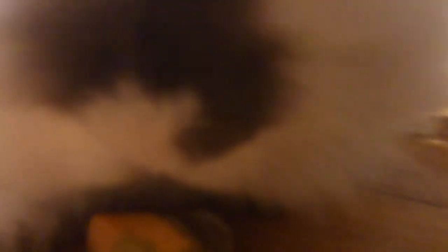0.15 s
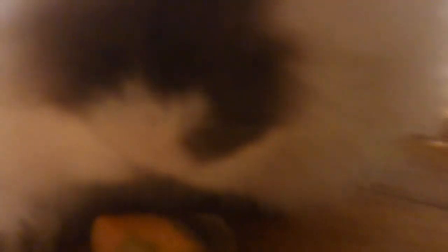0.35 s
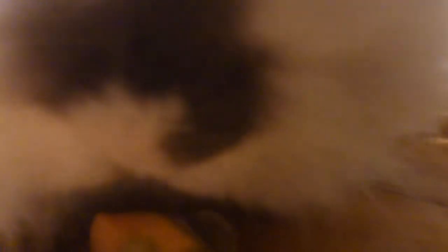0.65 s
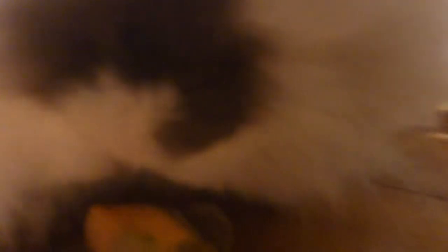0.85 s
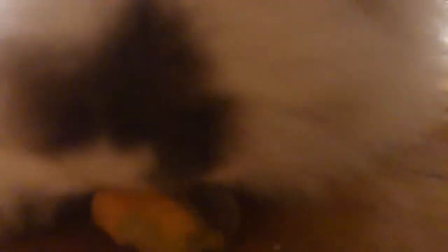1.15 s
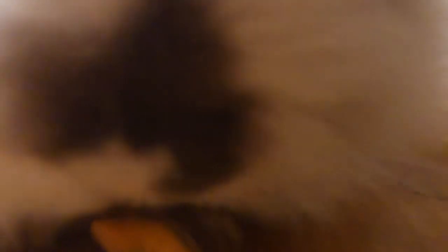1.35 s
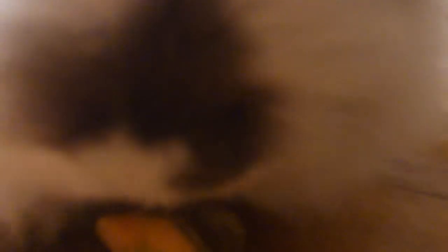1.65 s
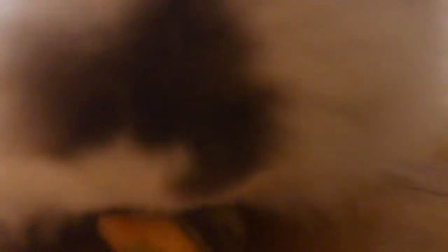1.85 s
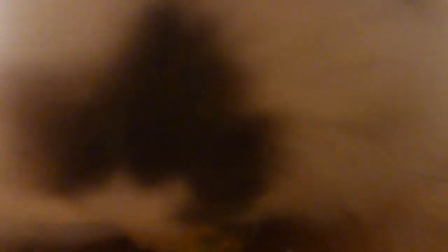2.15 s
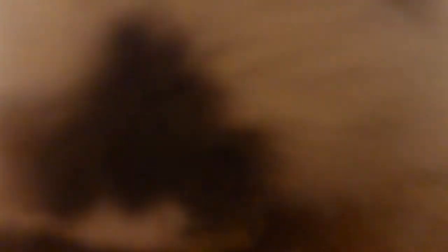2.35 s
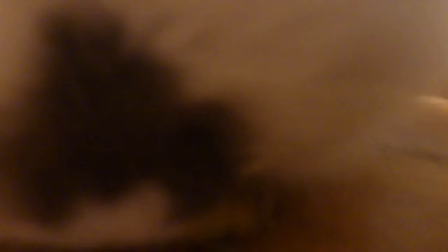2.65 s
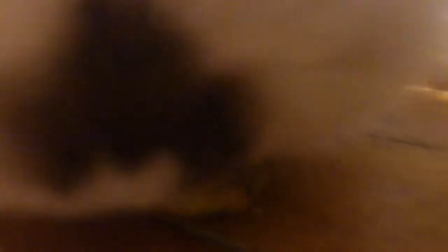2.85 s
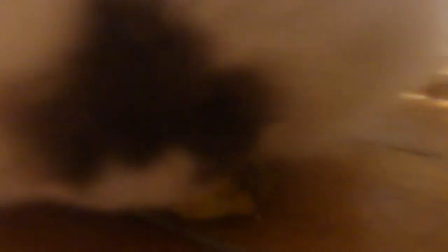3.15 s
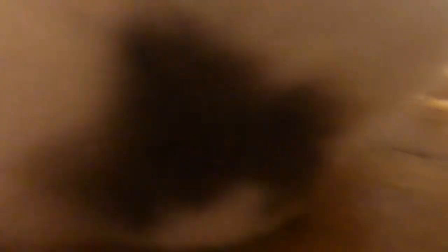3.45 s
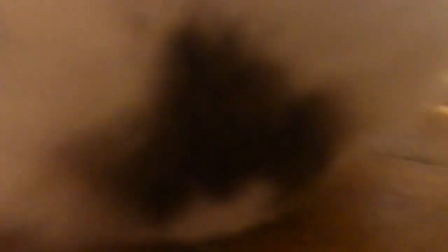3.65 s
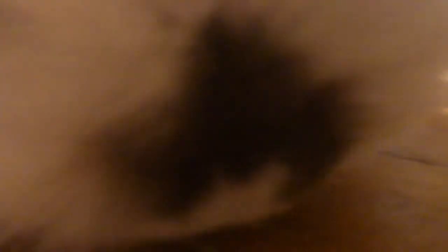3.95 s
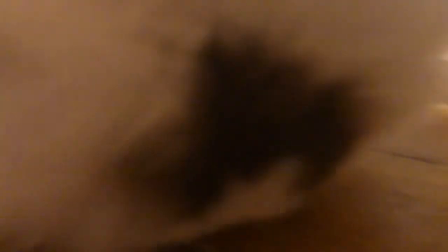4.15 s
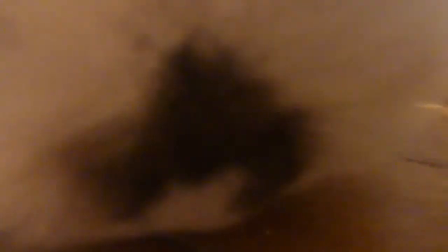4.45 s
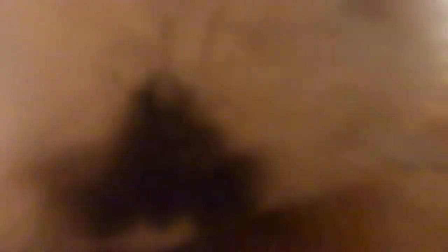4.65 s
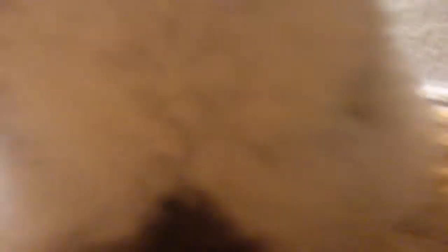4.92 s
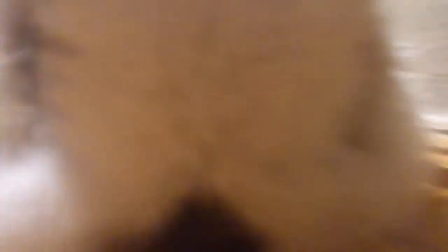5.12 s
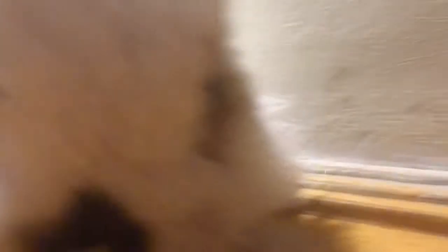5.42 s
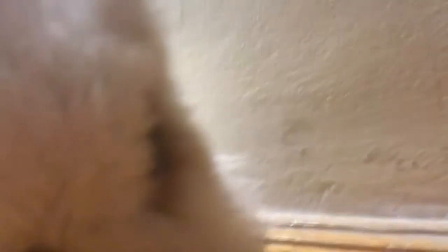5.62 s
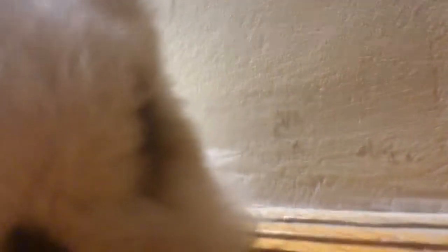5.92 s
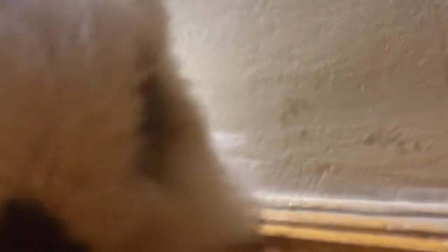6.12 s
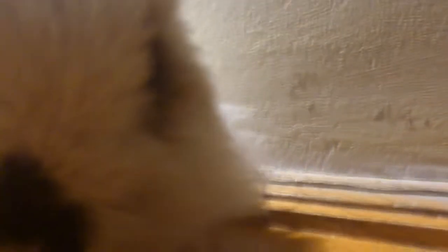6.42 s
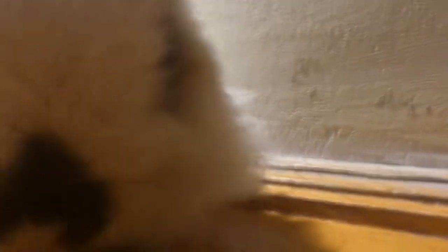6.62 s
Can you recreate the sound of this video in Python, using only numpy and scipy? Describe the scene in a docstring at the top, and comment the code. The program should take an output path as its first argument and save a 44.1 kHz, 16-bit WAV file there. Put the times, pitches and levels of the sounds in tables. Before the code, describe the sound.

Very close, dull rapid rabbit chewing gives way to a sharp carrot bite and crisp wet crunching, while a low drone swells behind.

```python
"""A quiet humming room: a rabbit eats a carrot very close by, a little to the left.
It grinds with its mouth shut, four or five strokes a second, then bites off a fresh piece and crunches brightly.
Each stroke is a swarm of tiny bursts, the crushed cells; snapping fibre bundles are single filtered clicks.
Wet pops are decaying sines, sniffs and air are shaped noise, and hum and drone are wavering sines.
The low drone swells in the second half."""
import sys
import numpy as np
from scipy import signal
from scipy.fft import rfft, irfft, next_fast_len
from scipy.io import wavfile
from scipy.ndimage import map_coordinates

SR = 44100
rng = np.random.default_rng(int(sys.argv[2]) if len(sys.argv) > 2 else 0)


def to_wav(s):
    """Save 16-bit WAV."""
    ch = np.atleast_2d(s).T  # columns
    pcm = np.round(np.clip(ch, -1, 1) * 32767)  # PCM
    wavfile.write(sys.argv[1], SR, pcm.astype(np.int16))


N = 298998


def amp(db):
    """Decibels to gain."""
    return 10 ** (np.asarray(db) / 20)


def unit(x):
    """Scale to rms 1."""
    return x / np.sqrt(np.mean(x ** 2) + 1e-20)


def along(points, hz):
    """Read a curve of (Hz, value) points on a log frequency axis."""
    point_hz, values = np.transpose(points)
    return np.interp(np.log(hz + 1), np.log(point_hz + 1), values)


def curves(rows):
    """One value per sample for each column after the time."""
    times, *columns = np.transpose(rows)
    return [np.interp(np.arange(N) / SR, times, column) for column in columns]


def wobble(rate):
    """A smooth random curve, rate knots a second."""
    knots = rng.standard_normal(int(N * rate / SR) + 4)
    return map_coordinates(knots, [np.arange(N) * rate / SR])


def filtered(x, response):
    """Shape the spectrum of x by a response of frequency."""
    size = next_fast_len(N + SR // 2)
    return irfft(rfft(x, size) * response(np.fft.rfftfreq(size, 1 / SR)), size)[..., :N]


def swells(times, widths, levels_db):
    """Gain curve made of bell-shaped swells of power."""
    t = np.arange(0, N, 32) / SR
    bells = np.exp(-((t[:, None] - times) / widths) ** 2)
    power = bells @ amp(levels_db) ** 2
    return np.interp(np.arange(N) / SR, t, np.sqrt(power))


def add(out, s, sound):
    """Mix a stereo sound in at time s."""
    out[:, round(s * SR):][:, :sound.shape[1]] += sound


def ring(x, click):
    """Every burst in x rings with the given click."""
    return signal.fftconvolve(x, click, axes=1)[:, :N]


def ping(spectrum, lean_db, beam_hz, beam_octaves, pitch=1, spread=0.32, lead=.00014, size=1024):
    """Stereo click of mean energy 1: the left is lifted around beam_hz and leads; the right is lowered evenly."""
    hz = np.fft.rfftfreq(size, 1 / SR)
    beam = np.exp(-(np.log2((hz + 1) / pitch / beam_hz) / beam_octaves) ** 2)
    aim_db = lean_db * np.array([beam, np.full_like(hz, -spread)])
    cepstrum = irfft(np.log(amp(along(spectrum, hz / pitch) + aim_db)))
    cepstrum[:, 1:size // 2] *= 2  # causal: sharp front, ringing after
    cepstrum[:, size // 2 + 1:] = 0
    delay = 2j * np.pi * hz * np.array([[0], [lead]])
    click = irfft(np.exp(rfft(cepstrum) - delay))[:, :size // 2]
    return click / np.sqrt(np.sum(click ** 2) / 2)


def cells(rate, scatter_db, apart):
    """Stereo swarm of tiny bursts of uneven size, each with its own strength left and right."""
    bursts = (rng.random(N) < rate / SR) * rng.choice([-1, 1], N)
    sizes = amp(scatter_db * np.minimum(rng.standard_normal(N), 2))
    balance = 1 + apart * rng.standard_normal((2, N))
    return unit(bursts * sizes * balance)


def tone(hz, waver_hz, flutter_db):
    """A slightly unsteady sine of rms 1."""
    phase = 2 * np.pi * (np.cumsum(hz + waver_hz * wobble(5)) / SR + rng.random())
    return unit(np.sin(phase) * amp(flutter_db * wobble(7)))


# appliance hum, one row a partial: pitch_hz [Hz], level_db [dB rms]
HUM_PARTIALS = [(108.7, -50), (120.5, -53), (149.9, -57.5), (163.1, -56), (190.3, -53), (380.6, -66),
                (869.5, -62.5)]
# low drone from afar, a glide: time_s [s], pitch_hz [Hz], level_db [dB rms]
DRONE_GLIDE = [(0, 66.4, -72), (.9, 69.6, -50.5), (1.6, 76, -58), (3.2, 75.9, -61), (3.65, 65.94, -47),
               (4.3, 67.12, -44.5), (4.8, 67.8, -41), (5.2, 69.34, -40.5), (5.7, 69.7, -35.5),
               (6.1, 70, -38.5), (6.78, 68.3, -42)]
# colour of room air and microphone hiss: freq_hz [Hz], density_db [relative dB per Hz]
AIR_COLOUR = [(15, -1), (30, 1.5), (45, 6), (70, -3), (130, -9), (220, -10), (330, -10.5), (650, -15),
              (870, -16), (1100, -19), (2000, -24), (5000, -27), (10000, -29), (15500, -32.5)]
# how alike the air is left and right: freq_hz [Hz], likeness [1 is mono, 0 is unrelated]
AIR_LIKENESS = [(25, 1), (70, 0.71), (150, 0.73), (500, 0.75), (1500, 0.04), (5000, 0.024)]


def background():
    """Appliance hum and a distant drone as wavering sines, and the air of the room as coloured noise."""
    hum = sum(amp(db) * tone(hz, waver_hz=0.0016 * hz, flutter_db=1.56) for hz, db in HUM_PARTIALS)
    drone_hz, drone_db = curves(DRONE_GLIDE)
    drone = amp(drone_db) * tone(drone_hz, waver_hz=0.9, flutter_db=1.2)

    def mid_side(hz):
        """Share the noise between mid and side so left and right match by the wanted likeness."""
        turn = np.arccos(np.clip(along(AIR_LIKENESS, hz), -1, 1)) / 2
        return amp(along(AIR_COLOUR, hz)) * [np.cos(turn), np.sin(turn)]

    mid, side = filtered(rng.standard_normal((2, N)), mid_side)
    air = unit(np.array([mid + side, mid - side]))
    return hum + drone + amp(-46) * air


# decay of the room: freq_hz [Hz], t60_s [s to fall 60 dB]
ROOM_DECAY = [(200, 0.14), (1500, 0.13), (8000, 0.071), (16000, 0.076)]


def room(x):
    """Floor and wall answer briefly: noise decaying faster in the treble, 90 samples late."""
    hz, t, grains = signal.stft(rng.standard_normal((2, SR // 3)), SR, nperseg=256)
    decay = amp(-60 * t / along(ROOM_DECAY, hz)[:, None])
    tail = signal.istft(grains * decay, SR, nperseg=256)[1]
    tail = tail / np.linalg.norm(tail[0])
    return ring(x, np.pad(tail, ((0, 0), (90, 0))))


# the mouth over time: time_s [s], parted [lips, 0-1], filled [cheek, 0-1]
MOUTH_SHAPE = [(0, 0.2, 0), (2.2, 0.27, 0.32), (2.9, 0.95, 0.6), (3.6, 0.86, 0.84), (4.3, 0.95, 0.96),
               (4.8, 0.93, 0.8), (5.3, 0.4, 0.98), (5.5, .55, 0.92), (5.95, 0, 0.73), (6.25, 0.5, 0.62),
               (6.78, 0.62, 0.64)]


def lips(s):
    """How far the lips are parted at time s, 0-1."""
    times, parted, _ = np.transpose(MOUTH_SHAPE)
    return np.clip(np.interp(s, times, parted), 0, 1)


# the rabbit's nose: middle_s [s], half_length_s [s], level_db [dB rms at the middle]
NOSE_SNIFFS = [(4.948, 0.015, -46), (5.185, 0.021, -51.5), (6.411, 0.016, -54), (6.656, 0.018, -62)]
# breaking flesh heard through open lips, also for chewing and snaps: freq_hz [Hz], level_db [relative dB]
CRISP_COLOUR = [(1200, -20), (2400, -7), (3300, -8), (4300, -10), (5400, -1.5), (7000, -0.5), (9000, 0.5),
                (11500, -4.5), (15000, -9.5), (16500, -19)]
RUSTLE_DB, RUSTLE_FILLED_DB = -66, 15.5  # level with an empty cheek; its rise as the cheek fills


def muzzle():
    """Wet lips and fur tick faintly as clumped bursts, and the nose sniffs in a narrow hiss."""
    _, filled = np.clip(curves(MOUTH_SHAPE), 0, 1)
    rustle_db = RUSTLE_DB + RUSTLE_FILLED_DB * filled
    ticks = unit(amp(5.1 * wobble(90)) * cells(rate=900, scatter_db=3.0, apart=0.68))
    rustle = amp(rustle_db) * ring(ticks, ping(CRISP_COLOUR, lean_db=7.5, beam_hz=8620, beam_octaves=0.2))
    # freq_hz, relative level_db
    nostril = [(1500, -33), (4100, -1), (5000, 8), (5900, -15), (7200, -16), (10000, -41)]
    sniff = unit(filtered(rng.standard_normal((2, N)), lambda hz: amp(along(nostril, hz))))
    return rustle + swells(*np.transpose(NOSE_SNIFFS)) * sniff


# pops and smacks: start_s [s], level_db [dB before rise and decay], pitch_hz [Hz at the start],
# lean_db [dB, left over right]
MOUTH_POPS = [(2.542, -31, 258, 8), (3.6469, -20.5, 683, 7), (3.647, -31, 410, 12), (5.166, -27.5, 2240, 6),
              (5.2444, -27, 590, 2), (5.37, -19.5, 1240, 4), (5.932, -13, 1417, -4), (5.933, -28, 299, -3),
              (6.671, -32.5, 1120, 11)]
SMACK_CYCLES = 12.2  # a pop dies by 60 dB within this many cycles of its starting pitch


def smacks(rise_s=0.00036, glide=0.065):
    """A pocket of air in the wet mouth pops open and rings, rising a little in pitch."""
    out = np.zeros((2, N + SR))
    t = np.arange(SR // 8) / SR
    for s, db, hz, lean_db in MOUTH_POPS:
        t60 = SMACK_CYCLES / hz
        pitch_hz = hz * (1 + glide * np.minimum(t / t60, 1))
        phase = 2 * np.pi * np.cumsum(pitch_hz) / SR
        pop = np.sin(phase) * amp(db - 60 * t / t60) * (1 - np.exp(-t / rise_s))
        add(out, s, pop * amp([[lean_db / 2], [-lean_db / 2]]))
    return out[:, :N]


# crunches around and after the bite: middle_s [s], half_length_s [s], level_db [dB before the chewing trim]
CRUNCH_STROKES = [(2.553, .023, -45.5), (2.78, 0.042, -45.5), (2.858, 0.0078, -30), (2.938, 0.024, -47.5),
                  (3.073, 0.0038, -34), (3.145, 0.03, -41), (3.37, .025, -45), (3.61, .022, -40),
                  (3.655, .012, -29.5), (3.747, 0.018, -47), (3.915, 0.024, -36), (3.968, .005, -33.5),
                  (4.075, 0.0095, -48), (4.211, 0.0078, -37.5), (4.254, 0.019, -35.5), (4.503, 0.024, -38),
                  (4.762, 0.036, -36), (5.008, .033, -39.5), (5.255, 0.036, -41.5), (5.392, 0.031, -44),
                  (5.487, 0.028, -42), (5.773, 0.032, -50), (5.942, .012, -42), (5.992, 0.048, -44.5),
                  (6.218, .02, -39.5), (6.51, 0.03, -42.5), (6.785, 0.045, -45)]
# steady grinding: the first strokes come a little slower, then the jaw settles into its pace
GRIND_START_S, GRIND_PERIOD_S, SETTLE_S, SETTLE_STROKES = 0.084, 0.215, 0.051, 1.5
GRIND_HALF_S, GRIND_DB, GRIND_RISE_DB_PER_S = .024, -46.5, 0.73
# cheek over lip sound with the mouth shut, before the chewing trims; its change as the lips part
MUFFLED_DB, MUFFLED_PARTED_DB = 0.5, -11


def strokes(count=11):
    """Every jaw stroke: middle s, half length s, crisp dB, muffled dB; parted lips leave less in the cheek."""
    k = np.arange(count)
    beats = GRIND_START_S + GRIND_PERIOD_S * k + SETTLE_S * (1 - np.exp(-k / SETTLE_STROKES))
    grinding = [(s, GRIND_HALF_S, GRIND_DB + GRIND_RISE_DB_PER_S * s) for s in beats]
    s, width, db = np.transpose(grinding + list(CRUNCH_STROKES))
    return s, width, db, db + MUFFLED_DB + MUFFLED_PARTED_DB * lips(s)


CRISP_HZ = 8100  # centre of an average snap
# small fractures: energy over the crisp and the muffled level of their stroke; scatter of size
CHIP_DB, CHIP_KNOCK_DB, CHIP_SCATTER_DB = 17.5, 20, 5.5
# the teeth meet this many half lengths before the middle of a stroke; relative scatter of pitch
CHIP_LEAD, CHIP_DETUNE = .45, .07


def chips(count=2, spread=.7):
    """A few small fractures fall at random as the teeth meet in each stroke; rows as for the snaps."""
    rows = []
    for s, width, crisp_db, muffled_db in zip(*strokes()):
        for when, strength, colour in np.clip(rng.standard_normal((count, 3)), -2, 2):
            size_db = CHIP_SCATTER_DB * strength
            start_s = max(s + width * (spread * when - CHIP_LEAD), 0)
            snap_db = crisp_db + CHIP_DB + size_db
            knock_db = muffled_db + CHIP_KNOCK_DB + size_db
            rows.append((start_s, snap_db, knock_db, CRISP_HZ * (1 + CHIP_DETUNE * colour)))
    return rows


def fracture(click, splinter_db, splinter_t60, splinter_hz=2500, size=1024):
    """One sudden break, then splinters for a few milliseconds, all ringing with the click."""
    splinters = rng.standard_normal((2, size)) * amp(-60 * np.arange(size) / SR / splinter_t60)
    # small pieces carry little bass
    high_pass = signal.butter(1, min(splinter_hz, SR / 4), "high", fs=SR)
    splinters = signal.lfilter(*high_pass, splinters)
    force = amp(splinter_db) * splinters / np.linalg.norm(splinters[0])
    force[:, 0] = 1
    return signal.fftconvolve(force, click, axes=1)


# fibre bundles breaking: start_s [s], crisp_db and knock_db [dB click energy before dulling and splinters],
# pitch_hz [Hz, centre]
FIBRE_SNAPS = [(0.5109, -25, -15, 7900), (0.5275, -16.5, -11, 6550), (0.7473, -11.5, -2, 7100),
               (1.171, -27, -16, 6000), (1.8562, -22, -13.5, 6700), (2.2604, -20.5, -14, 8100),
               (2.7567, -13, -16, 8500), (2.7659, -9.5, -11, 6400), (3.0719, -9.5, -22, 10200),
               (3.6013, 7.5, -3, 8740), (3.6233, 0.5, -9.5, 8300), (3.6422, 1, -9, 8100),
               (3.6469, -3.5, -9, 7650), (3.9215, 1.5, -6.5, 8150), (4.0225, -3.5, -24, 8800),
               (4.172, -14.5, -38, 6950), (4.2115, -29, -17.5, 8000), (4.2563, -3, -20, 9600),
               (4.5888, -17.5, -24, 7460), (4.6801, -18.5, -30, 5750), (4.7112, -6, -22, 8300),
               (4.7375, -1.5, -20, 8280), (4.8663, -15, -23.5, 6160), (4.9874, -1.5, -20, 7200),
               (5.0639, -14.5, -23, 8750), (5.1147, -17, -22.5, 7050), (5.2219, -13.5, -30, 6000),
               (5.2445, -4.5, -24, 7600), (5.284, -7, -28, 7400), (5.9325, -19, -26, 7900),
               (6.1938, -13.5, -16.5, 7000), (6.2395, -10.5, -23, 7340), (6.7628, -0.5, -17.5, 8160)]
# a fracture knocking through the jaw: freq_hz [Hz], level_db [relative dB]
KNOCK_COLOUR = [(100, -6), (300, -4), (600, 6), (1050, 1), (1500, -6.5), (1950, 0.5), (2600, -15),
                (5000, -19), (10000, -39)]
# the piece breaks off in two cracks: start_s [s], level_db [dB click energy before splinters],
# lean_db [dB, lift of the left beam]
BITE_CRACKS = [(2.8472, 10, 5), (2.8536, 1, 1.5)]
# the whole carrot and the skull ringing together: freq_hz [Hz], level_db [relative dB]
BITE_COLOUR = [(100, -17), (330, -14), (700, -0.5), (1000, -6.5), (1500, -1.5), (1950, -6.5), (2600, -22),
               (3500, -5.5), (4300, -16.5), (5400, -3), (6400, -13), (9500, -9.5), (13000, -11),
               (16000, -33)]
SNAP_LEAN_DB, SNAP_PARTED_LEAN_DB = 6, 6.5  # lift of the left beam, lips shut; its rise as they part
# upper edge of a 0 dB snap; bigger fractures take longer to run and sound duller
SNAP_TOP_HZ, SNAP_DULLING_HZ_PER_DB = 15300, 650


def snaps():
    """Fibre bundles snap between the teeth and knock through the jaw; the bite rings the whole carrot."""
    out = np.zeros((2, N + SR))
    for s, db, lean_db in BITE_CRACKS:
        body = ping(BITE_COLOUR, lean_db, beam_hz=1540, beam_octaves=0.13, spread=.8)
        add(out, s, amp(db) * fracture(body, splinter_db=-2, splinter_t60=0.0067))
    for s, crisp_db, knock_db, hz in list(FIBRE_SNAPS) + chips():
        lean_db = SNAP_LEAN_DB + SNAP_PARTED_LEAN_DB * lips(s)
        top_hz = np.clip(SNAP_TOP_HZ - SNAP_DULLING_HZ_PER_DB * crisp_db, SR / 10, SR / 2.2)
        crisp = ping(CRISP_COLOUR, lean_db, beam_hz=8200, beam_octaves=0.28, pitch=hz / CRISP_HZ)
        crisp = signal.lfilter(*signal.butter(2, top_hz, fs=SR), crisp)
        knock = ping(KNOCK_COLOUR, lean_db, beam_hz=1440, beam_octaves=1.0, spread=0.19, pitch=0.92)
        click = amp(crisp_db) * crisp - amp(knock_db) * knock
        add(out, s, fracture(click, splinter_db=-2.5, splinter_t60=.016))
    return out[:, :N]


# breaking flesh heard through cheek and skull: freq_hz [Hz], level_db [relative dB]
HOLLOW_COLOUR = [(100, -24), (300, -3), (700, 3), (1200, 0.5), (1650, -5), (2000, 0.5), (2500, -8),
                 (3300, 2), (4500, -16), (9000, -39)]
# the crushing through a cheek packed with fresh carrot: freq_hz [Hz], level_db [relative dB]
PACKED_COLOUR = [(100, -13.5), (260, 2), (450, 3.5), (720, -1), (950, -3.5), (1500, -8), (2000, -9.5),
                 (2600, -6), (3600, -6), (5000, -28), (9000, -69)]


def chewing():
    """Teeth crush cells in clumps; the crackle comes out between the lips and, duller, through the cheek."""
    s, width, crisp_db, muffled_db = strokes()
    parted, filled = np.clip(curves(MOUTH_SHAPE), 0, 1)
    crush = unit(amp(2.1 * wobble(220)) * cells(rate=6000, scatter_db=4.0, apart=1.0))
    shut = ring(crush, ping(CRISP_COLOUR, lean_db=4, beam_hz=9600, beam_octaves=0.18, pitch=0.84))
    wide = ring(crush, ping(CRISP_COLOUR, lean_db=11, beam_hz=8360, beam_octaves=0.38, pitch=1.052))
    crisp = unit((1 - parted) * shut + parted * wide)  # parted lips let a brighter beam out
    # coarser crumbs carry best through bone
    crumbs = crush + 1.1 * cells(rate=450, scatter_db=0.0, apart=0.47)
    grit = unit(amp(5.3 * np.minimum(wobble(130), 1.3)) * crumbs)
    hollow = ring(grit, ping(HOLLOW_COLOUR, lean_db=11.5, beam_hz=1660, beam_octaves=0.21))
    packed = ring(grit, ping(PACKED_COLOUR, lean_db=3.5, beam_hz=1520, beam_octaves=0.27, spread=0.29))
    muffled = unit((1 - filled) * hollow + filled * packed)  # a full cheek sounds deeper
    early = s - 0.3 * width  # the dull grinding leads the bright crackle
    crackle = amp(-1.0) * swells(s, width, crisp_db) * crisp
    grinding = amp(1.5) * swells(early, width, muffled_db) * muffled
    return crackle + grinding


def scene():
    """The rabbit close by, in its room."""
    rabbit = chewing() + snaps() + smacks() + muzzle()
    return rabbit + amp(-16.0) * room(rabbit) + background()


def record(dry):
    """A steep band limit removes everything from 16 kHz up."""
    return filtered(dry, lambda hz: hz < 16000)


dry = scene()
out = record(dry)
to_wav(out)
```